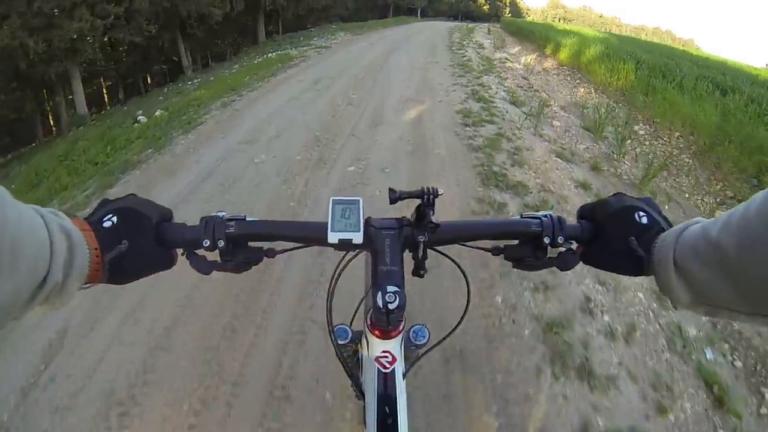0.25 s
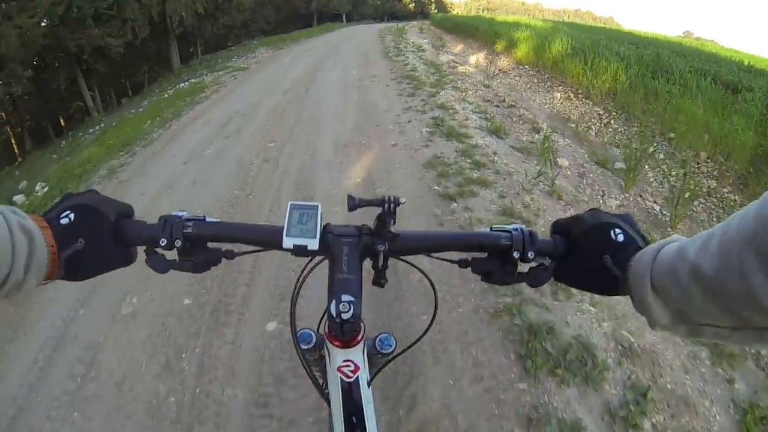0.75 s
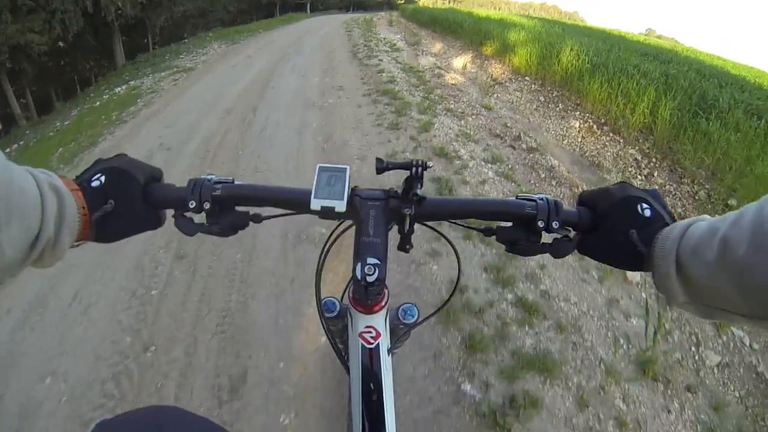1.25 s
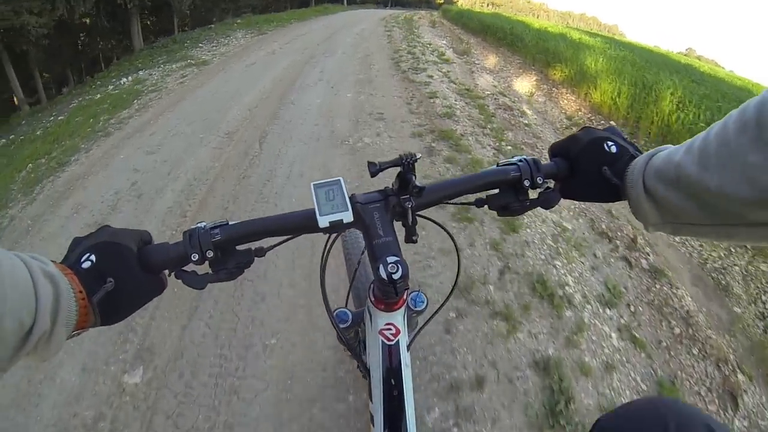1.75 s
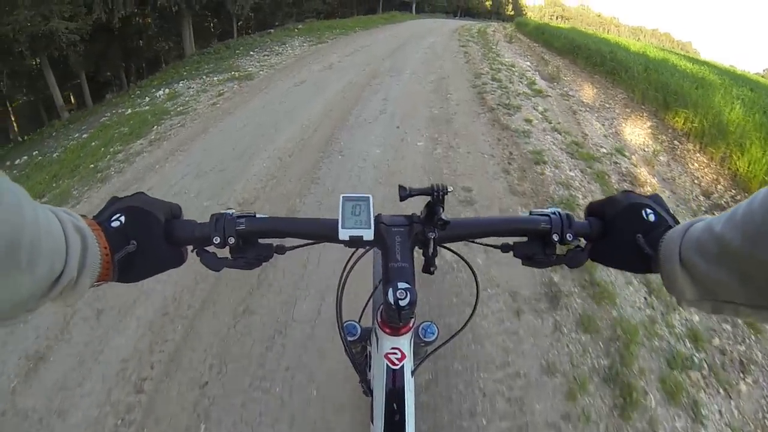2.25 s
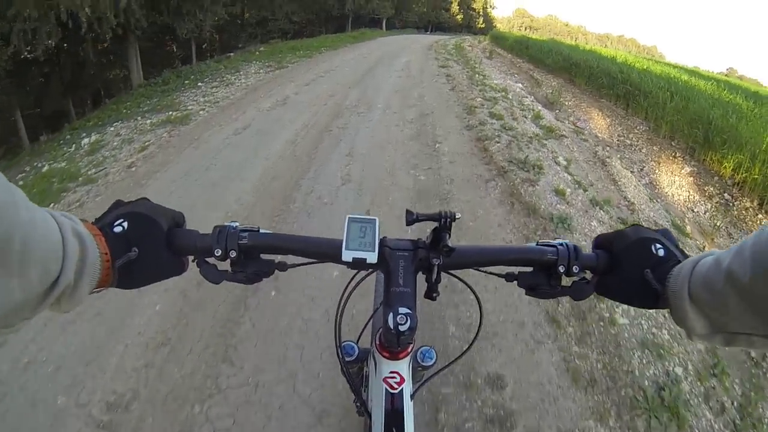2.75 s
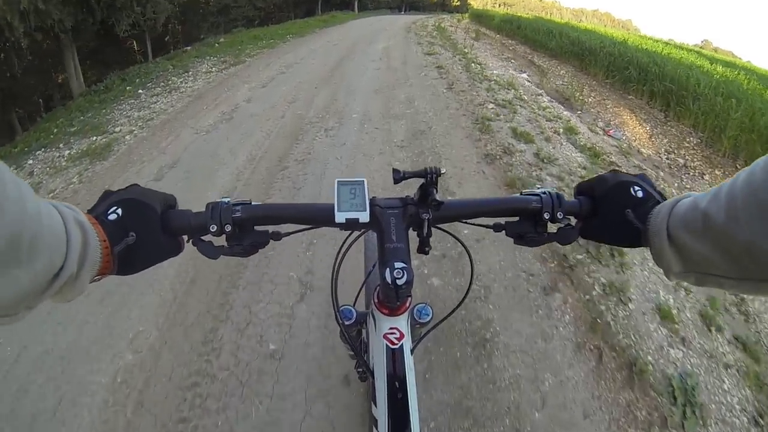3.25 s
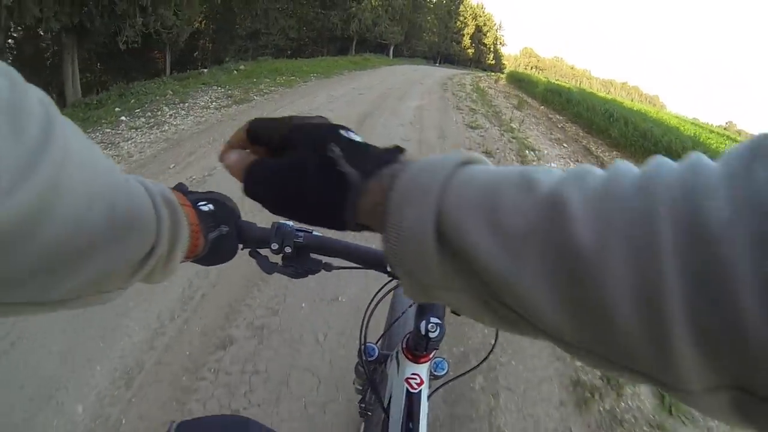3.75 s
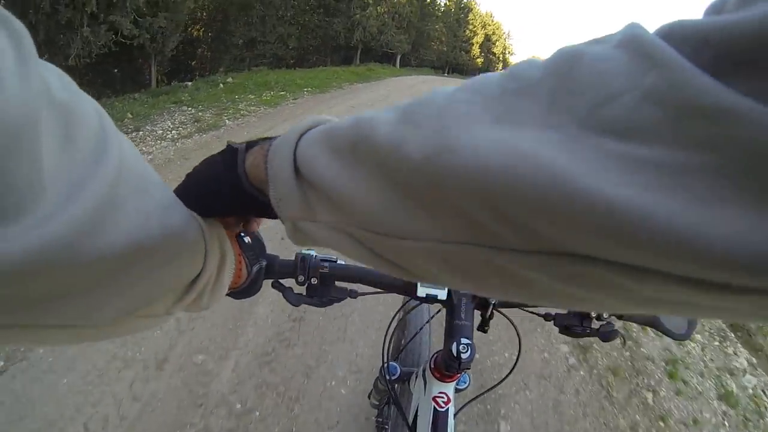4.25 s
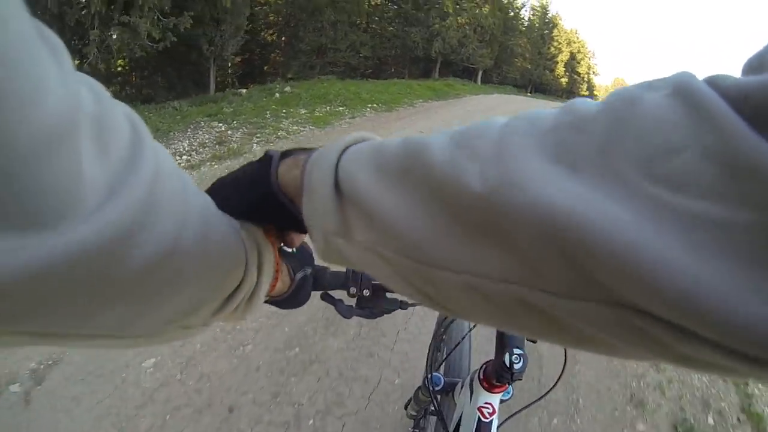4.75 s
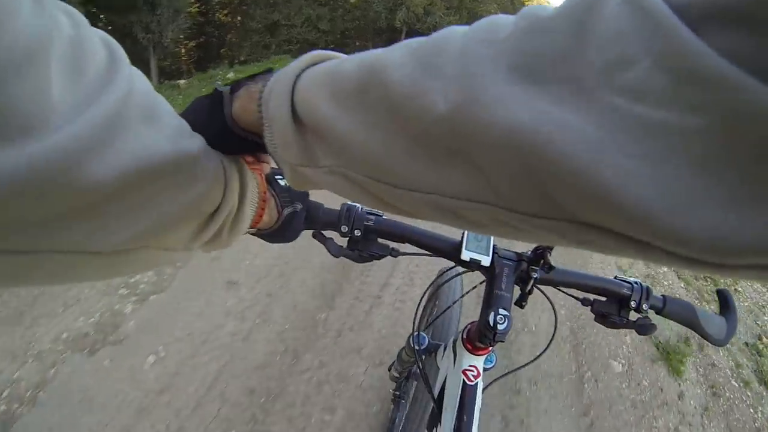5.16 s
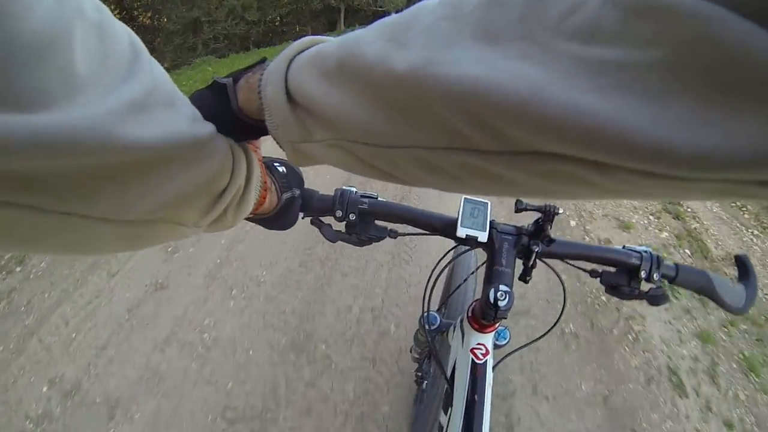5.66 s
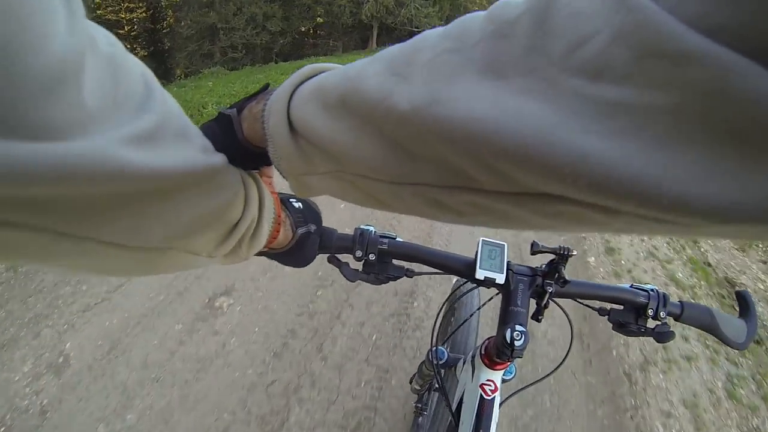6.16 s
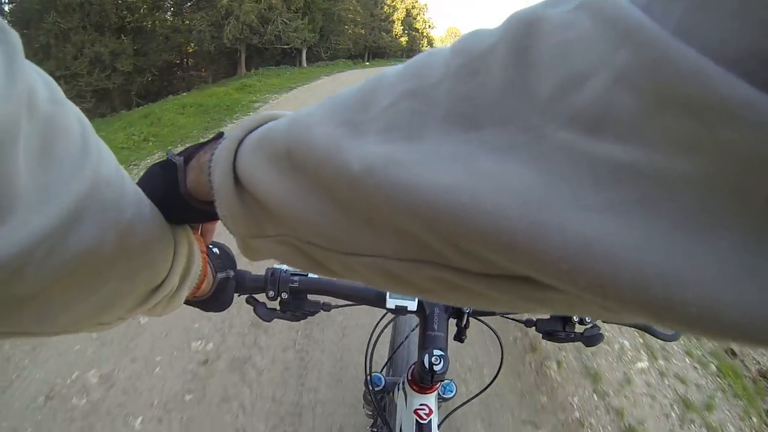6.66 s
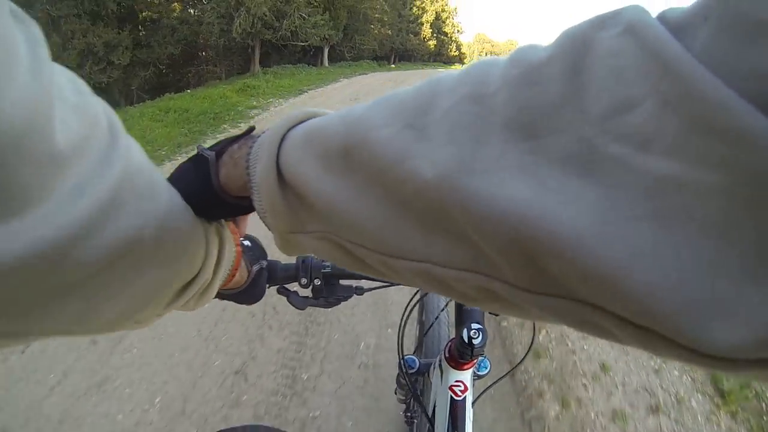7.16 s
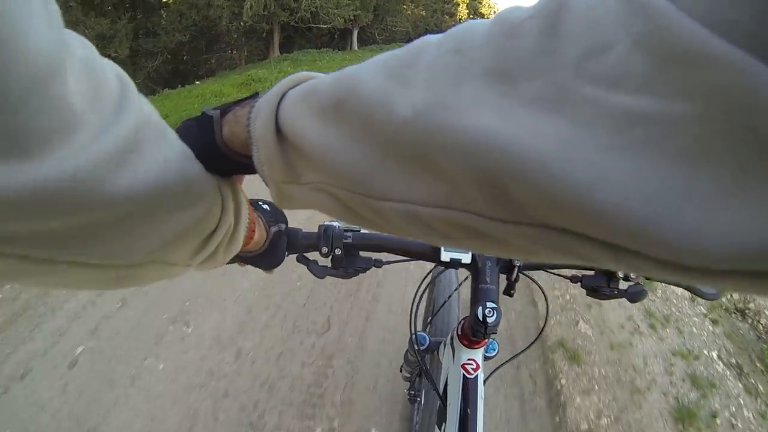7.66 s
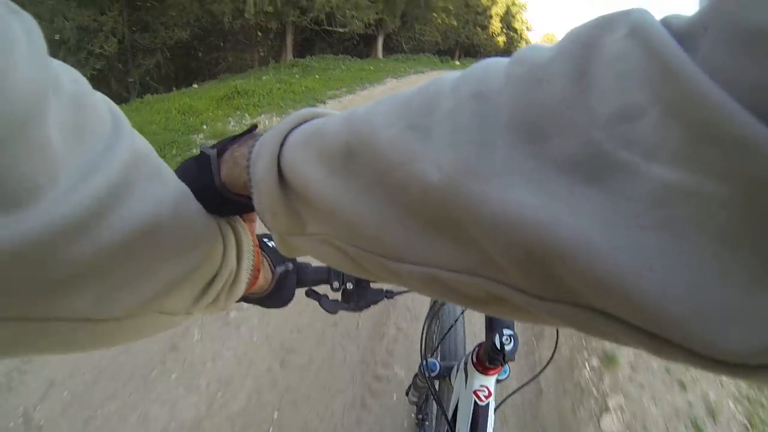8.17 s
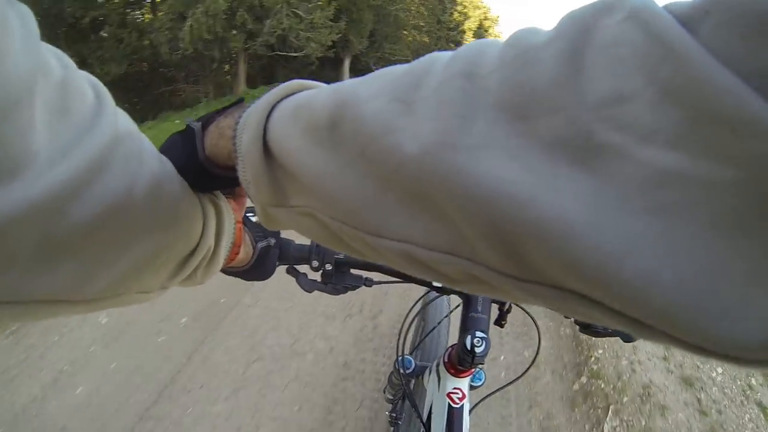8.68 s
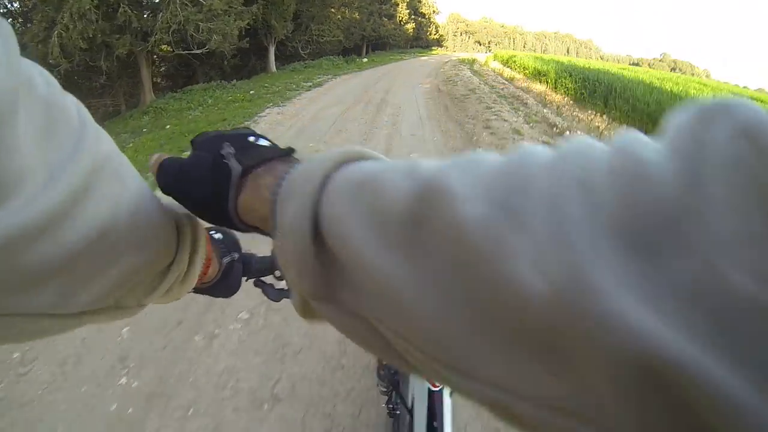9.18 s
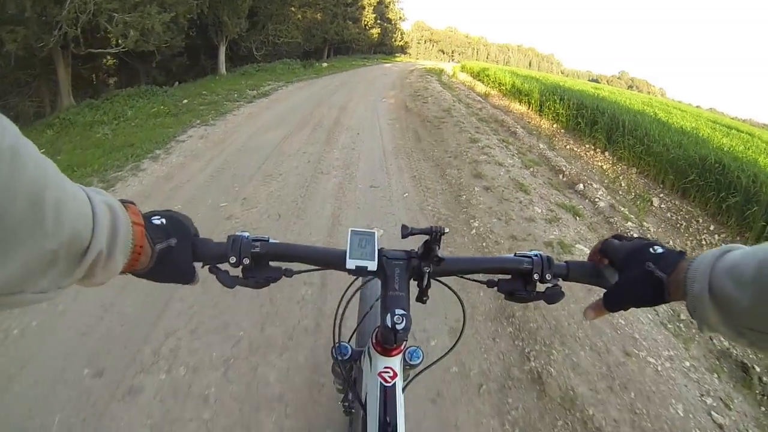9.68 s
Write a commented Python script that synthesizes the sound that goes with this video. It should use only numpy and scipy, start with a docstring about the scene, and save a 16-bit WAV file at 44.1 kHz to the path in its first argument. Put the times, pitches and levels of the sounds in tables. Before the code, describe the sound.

Steady tyre rumble and gritty crunching come from a bicycle on an outdoor gravel track, with wind thumping on a body-worn microphone and stones popping under the tread. Partway through, the rider's arm bumps and scrapes the camera. Stronger gusts and a few loud stone snaps follow, while the plastic camera mount clacks and briefly buzzes. Near the end a sleeve swishes past and the tyres roll on.

```python
"""Tyres rumble and crunch over gravel as a mountain bike rolls on, heard from a chest-worn camera.
Tread impacts merge into noise that swells with each pedal stroke, stones snap out from under the
tyres, and turbulent air buffets the housing. The rider reaches across to one wrist: a sleeve rustles
by friction and the arm lands on the camera. As the bike jolts, impacts excite resonant modes:
the housing knocks dully and the plastic mount taps and clacks."""
import sys
import numpy as np
from scipy import signal
from scipy.fft import rfft, irfft
from scipy.io import wavfile

SR = 44100
rng = np.random.default_rng(int(sys.argv[2]) if len(sys.argv) > 2 else 0)


def unload_audio(sound):
    """Save the sound as a 16-bit wav file, at the path given as the first command line argument."""
    columns = np.transpose(np.atleast_2d(sound))
    # keep every value between -1 and 1, then stretch to whole-number steps
    steps = np.round(np.clip(columns, -1, 1) * 32767)
    wavfile.write(sys.argv[1], SR, steps.astype(np.int16))


N = 437472
TIME = np.arange(N) / SR


def from_db(db):
    """Amplitude ratio of a level in decibels."""
    return 10 ** (np.asarray(db) / 20)


def unit_rms(x):
    """Normalisation to unit power."""
    return x / np.sqrt(np.mean(x ** 2) + 1e-20)


def curves(rows):
    """Linear interpolation: each column after the time, at every sample."""
    times, *columns = np.transpose(rows)
    return [np.interp(TIME, times, column) for column in columns]


def add(out, start_s, sound):
    """Superposition of a sound on the output."""
    start = round(start_s * SR)
    out[start:start + len(sound)] += sound[:N - start]


def swells(rows):
    """Amplitude envelope: one half-sine arch per row."""
    return sum(from_db(db) * np.sin(np.pi * np.clip((TIME - s) / length, 0, 1)) for s, length, db in rows)


def drift(corner_hz):
    """Low-passed Gaussian noise: a smooth fluctuation of unit power."""
    hz = np.fft.rfftfreq(N, 1 / SR)
    return unit_rms(irfft(rfft(rng.standard_normal(N)) / (1 + (hz / corner_hz) ** 2), N))


def grains(per_s, spread_db):
    """Shot noise: random clicks, a few much larger than the rest (smaller if the spread is negative)."""
    sizes = from_db(spread_db * np.minimum(rng.exponential(1, N), 4)) * rng.choice([-1, 1], N)
    return sizes * (rng.random(N) < per_s / SR)


def band(x, low_hz, high_hz):
    """Butterworth band-pass filter."""
    return signal.sosfilt(signal.butter(3, [low_hz, high_hz], "band", fs=SR, output="sos"), x)


def colour(x, spectrum):
    """Minimum-phase filter that follows a spectrum and falls 12 dB per octave beyond its ends."""
    size = 8192
    hz, level_db = np.transpose(spectrum)
    log_hz = np.log(np.fft.rfftfreq(size, 1 / SR) + 1)
    beyond = np.maximum(log_hz - np.log(hz[-1]), 0) + np.maximum(np.log(hz[0]) - log_hz, 0)
    gain = from_db(np.interp(log_hz, np.log(hz), level_db))
    cepstrum = irfft(np.log(gain) - 2 * beyond)
    cepstrum[1:size // 2] *= 2  # folding the cepstrum makes the response causal
    cepstrum[size // 2 + 1:] = 0
    return signal.fftconvolve(x, irfft(np.exp(rfft(cepstrum))))[:len(x)]


def pole_pair(hz, width_hz):
    """Damped oscillator: its pole radius and feedback coefficients."""
    radius, angle = np.exp(-np.pi * width_hz / SR), 2 * np.pi * hz / SR
    return radius, [1, -2 * radius * np.cos(angle), radius * radius]


def resonate(x, modes, in_phase=False):
    """Modal superposition: neighbours alternate in sign, or share it and leave notches between them."""
    out = 0
    for k, (hz, width_hz, level_db) in enumerate(modes):
        radius, poles = pole_pair(hz, width_hz)
        sign = 1 if in_phase else (-1) ** k
        out = out + sign * from_db(level_db) * signal.lfilter([1 - radius, 0, radius - 1], poles, x)
    return out


def contact(chatter, chatter_s):
    """Contact force: one impulse, then tiny rebounds that die out as the part seats."""
    t = TIME[:SR // 8]
    force = chatter * rng.standard_normal(len(t)) * np.exp(-(t / chatter_s) ** 2)
    force[0] += 1
    return force


def pushes(rows, rise_cycles):
    """Heavily damped oscillation: each soft shove swings for a cycle or two."""
    out, t = np.zeros(N), TIME[:SR // 4]
    for s, peak_db, hz in rows:
        age = hz * t / rise_cycles
        envelope = from_db(peak_db) * (age * np.exp(1 - age)) ** 2
        add(out, s, -envelope * np.sin(2 * np.pi * hz * t))
    return out


# the forearm in front of the camera: (time [s], share covered [0-1])
ARM_COVER = [(0, 0.03), (3.9, 0.03), (4.6, 0.64), (9.15, 1), (9.45, 0)]

def arm_cover():
    """Obstruction: the share of the way to the camera that the forearm blocks."""
    return curves(ARM_COVER)[0]


# tones of the electronics: (frequency [Hz], bandwidth [Hz], gain [dB])
WHINE_TONES = [(10070, 240, -16), (10500, 25, -22)]

def whine():
    """Narrow-band noise: the electronics' thin whine, weaker in the forearm's acoustic shadow."""
    level_db = -82.5 - 4 * arm_cover()
    return from_db(level_db) * unit_rms(resonate(rng.standard_normal(N), WHINE_TONES))


# strength of the airstream: (time [s], level [dB])
AIRSTREAM = [(0, -41.5), (.45, -38.5), (1.15, -40.5), (1.8, -43.5), (3.2, -44), (3.8, -42.5), (4.6, -40),
             (5.2, -36.5), (5.9, -37), (6.95, -38), (7.7, -35.5), (8.25, -35.5), (9.0, -34.5),
             (9.35, -39.5), (9.92, -41)]
# spectra of the free stream and of the forearm's wake: (frequency [Hz], relative level [dB])
STREAM_SPECTRUM = [(15, -8.5), (28, -4), (45, 3), (68, -2.5), (90, -6), (120, -15), (160, -9.5), (220, -24),
                   (500, -33.5)]
WAKE_SPECTRUM = [(15, -20), (28, 0.5), (45, 0.5), (70, -2), (110, -2), (160, -9), (220, -14.5), (400, -38),
                 (900, -47)]
# the strongest gusts: (time [s], duration [s], level [dB])
BUFFETS = [(4.985, 0.068, -39), (5.17, 0.081, -37), (5.33, 0.11, -38), (5.61, 0.098, -39), (5.85, .1, -42),
           (6.38, 0.061, -39), (7.23, 0.14, -37), (7.84, 0.08, -37), (8.62, .09, -36), (9.16, 0.049, -35)]
# single eddies striking the housing: (time [s], envelope peak [dB], frequency [Hz])
EDDY_THUMPS = [(1.281, -27, 68), (5.008, -27, 80), (5.637, -23, 95), (6.392, -23, 58), (6.402, -29, 130),
               (7.243, -25, 62), (7.875, -30, 71)]

def wind():
    """Turbulence: low pressure fluctuations on the housing; the forearm sheds smaller, higher eddies."""
    stream_db, = curves(AIRSTREAM)
    cover = arm_cover()
    free = unit_rms(colour(rng.standard_normal(N), STREAM_SPECTRUM))
    wake = unit_rms(colour(rng.standard_normal(N), WAKE_SPECTRUM))
    gust_db = 1.5 * drift(corner_hz=13)
    strength = from_db(stream_db + gust_db) + swells(BUFFETS)
    turbulence = np.sqrt(1 - cover) * free + np.sqrt(cover) * wake
    return strength * turbulence + pushes(EDDY_THUMPS, rise_cycles=0.65)


# the sleeve sliding, its folds crinkling, the forearm sweeping by: (time [s], duration [s], level [dB])
RUSTLES = [(.95, .35, -82), (3.35, .73, -78), (4.14, .25, -74), (4.47, 0.12, -82), (4.75, .32, -76),
           (5.39, .23, -80), (7.0, .35, -82), (9.19, .22, -69), (9.5, 0.46, -86)]
CRINKLES = [(.95, 0.0056, -61), (1.245, .005, -61), (4.24, .004, -63), (4.317, 0.0055, -64),
            (4.5363, .003, -55), (5.4807, .004, -62), (9.131, .006, -66), (9.346, .003, -53)]
SWEEPS = [(9.18, 0.097, -39.5), (9.24, 0.15, -44)]
# spectra of the fibres' hiss and of the fuller sweep: (frequency [Hz], relative level [dB])
HISS_SPECTRUM = [(3000, -5.5), (5000, 8), (7000, -0.5), (8700, 2.5), (9600, -2), (10600, -0.5),
                 (11500, -5.5), (13300, -5), (15000, -16)]
SWEEP_SPECTRUM = [(400, -1), (800, 11), (1300, -1), (2000, 3), (3200, -3), (4200, -14), (5500, -19),
                  (7000, -27)]

def sleeve():
    """Sliding friction: countless fibres slip in a hiss that flutters as the weave catches and lets go."""
    catching = from_db(2.5 * np.clip(drift(corner_hz=90), -2, 2))
    fidgeting = from_db(-73 + 0.3 * drift(corner_hz=5))
    strength = fidgeting + swells(RUSTLES) * catching + swells(CRINKLES)
    fibres = grains(per_s=16000, spread_db=5)
    hiss = strength * unit_rms(colour(fibres, HISS_SPECTRUM))
    sweep = swells(SWEEPS) * np.sqrt(catching) * unit_rms(colour(fibres, SWEEP_SPECTRUM))
    return hiss + sweep


# the ground along the track: (time [s], base rumble level [dB], base crunch level [dB])
GROUND = [(0.0, -42.5, -52), (1.16, -43, -51), (1.85, -45, -53), (2.29, -44, -51.5), (2.73, -44, -53),
          (3.29, -40, -50), (4.34, -43.5, -51.5), (5.17, -41.5, -52), (6.66, -41.5, -54.5),
          (7.04, -40, -51), (7.9, -41.5, -53), (8.15, -39.5, -50), (8.37, -41.5, -54.5),
          (9.28, -41.5, -51.5), (9.56, -41.5, -52), (9.92, -41.5, -49.5)]

def tread_levels(stroke_s=0.42, dead_centre_s=0.24):
    """Amplitude modulation: rumble and crunch ease at the crank's dead centres and vary with the ground."""
    rumble_db, crunch_db = curves(GROUND)
    slack = 1 - np.abs(np.sin(np.pi * (TIME - dead_centre_s) / stroke_s))
    uneven = drift(corner_hz=8.9)
    return rumble_db - 1.5 * slack + 0.9 * uneven, crunch_db - slack + 0.95 * uneven


# spectrum of flying sand: (frequency [Hz], relative level [dB])
SAND_SPECTRUM = [(1000, -8), (2200, 12.5), (3300, 6), (4200, 0.5), (5450, -20), (5900, -16), (7000, -17),
                 (9000, -29), (14000, -26)]

def sand(crunch_db):
    """Clustered shot noise: sand spits off the tread, slightly louder while the forearm is in front."""
    bunching = from_db(8 * np.clip(drift(corner_hz=45), -2, 2))
    spray = unit_rms(colour(grains(per_s=110 * bunching, spread_db=2.5), SAND_SPECTRUM))
    return from_db(crunch_db - 9.5 + 1.5 * arm_cover()) * spray


# spectra of knobs on packed dirt and of crushed gravel: (frequency [Hz], relative level [dB])
RUMBLE_SPECTRUM = [(120, -19), (185, -9), (235, 3), (300, 3.5), (390, -0.5), (500, 0), (630, -5), (800, -3),
                   (1000, -8.5), (1300, -24), (1900, -64), (3500, -36.5)]
CRUNCH_SPECTRUM = [(300, -7.5), (600, 0.5), (900, 6.5), (1200, 6.5), (1500, 0.5), (1950, 7), (2400, 0.5),
                   (3200, -1.5), (4000, -13.5), (5450, -22), (5950, -58), (9000, -47), (15000, -64)]
# jolts over loose gravel: (time [s], duration [s], crunch level [dB], rumble level [dB])
LOOSE_PATCHES = [(0.106, 0.03, -58, -64), (0.214, 0.046, -57, -55), (0.388, 0.045, -49, -44),
                 (0.463, 0.035, -43, -41), (0.545, 0.039, -46, -47), (0.734, 0.031, -44.5, -40),
                 (0.874, 0.051, -46, -39.5), (0.938, 0.017, -55, -49), (0.998, 0.042, -40.5, -38.5),
                 (1.06, 0.043, -43, -47), (1.162, 0.035, -42.5, -52), (1.47, 0.038, -53, -42),
                 (1.564, .014, -42, -46), (1.631, 0.053, -54, -49), (2.272, 0.06, -47, -46),
                 (2.37, 0.066, -49, -46.5), (2.556, 0.027, -63, -66), (3.114, .06, -55, -50),
                 (3.284, 0.01, -32, -34), (6.777, 0.038, -46, -42), (7.076, 0.011, -48, -43),
                 (8.326, .019, -44, -38), (9.708, 0.011, -36.5, -40)]
# the tyre striking embedded stones: (time [s], envelope peak [dB], frequency [Hz])
TYRE_KNOCKS = [(.9155, -25, 480), (3.284, -20.5, 400), (7.0785, -28, 560), (8.334, -27, 480),
               (9.706, -25, 560)]

def tyres(rumble_db, crunch_db):
    """Rolling noise: knobs drum on packed dirt and crush gravel; rough ground raises both together."""
    roughness = drift(corner_hz=32)
    drumming = colour(grains(per_s=5000, spread_db=3.5), RUMBLE_SPECTRUM)
    rumble = unit_rms(drumming * from_db(1.1 * roughness))
    crushing = grains(per_s=7000 * from_db(2.5 * roughness), spread_db=3)
    crunch = unit_rms(colour(crushing, CRUNCH_SPECTRUM))
    rolling = from_db(rumble_db + 1) * rumble + from_db(crunch_db + 3.5) * crunch
    loose = unit_rms(colour(grains(per_s=1100, spread_db=-4.5), CRUNCH_SPECTRUM))
    jolts = loose * swells([(s, length, db) for s, length, db, _ in LOOSE_PATCHES])
    jolts += rumble * swells([(s, length, db) for s, length, _, db in LOOSE_PATCHES])
    return rolling + jolts + pushes(TYRE_KNOCKS, rise_cycles=0.39)


def pebbles(per_s=7, peak_db=-35, ring_hz=2230, treble_db=9):
    """Poisson process: small stones met at random, as rows like those of LARGE_STONES."""
    times = TIME[rng.random(N) < per_s / SR]
    scatter = np.clip(rng.standard_normal((len(times), 3)), -2, 2)
    return [(s, peak_db - weak, ring_hz * 2 ** (0.15 * small), treble_db + 2 * hard)
            for s, (weak, small, hard) in zip(times, scatter)]


# the largest stones snapping: (time [s], peak level [dB], ring frequency [Hz], treble gain [dB])
LARGE_STONES = [(0.467, -32, 2350, 12), (.54, -32, 2200, -6), (.565, -32.5, 2400, 13),
                (.658, -28, 2230, 10), (.8778, -32, 2370, 13), (.895, -29, 2000, -6),
                (.916, -29, 2400, -10), (.92, -34, 2500, -10), (1.017, -35, 2000, -2),
                (1.03, -33, 2280, 17), (1.0755, -35, 2300, 6), (1.247, -38, 2400, 16),
                (1.34, -28.5, 2470, 12), (1.7547, -32, 2230, 4), (2.007, -37, 2300, -2),
                (2.0208, -30, 2330, -1), (2.147, -30, 2400, 5), (3.258, -29, 1970, -8),
                (3.78, -31, 2200, -4), (3.827, -30.5, 2100, -6), (3.847, -27, 2000, -6),
                (4.416, -34.5, 2300, -2), (4.495, -32, 2400, 3), (5.3805, -16.5, 2550, -2),
                (5.4023, -25.5, 2900, -1), (5.926, -28, 2030, -10), (6.766, -28.5, 2470, 1),
                (6.785, -31, 2350, 1), (6.847, -32, 2400, 5), (6.876, -26.5, 2370, 2),
                (6.971, -29, 2400, 7), (7.0347, -30, 2400, -3), (7.0788, -33, 2400, 7),
                (7.108, -28, 2630, 2), (7.315, -32, 2400, 7), (7.5224, -14.5, 2550, -3),
                (7.7469, -22.5, 2400, 22.5), (7.7487, -18.5, 2150, -3), (9.766, -27, 2220, 14),
                (9.819, -26, 2350, 10)]
# what the housing transmits of a snap: (frequency [Hz], gain [dB])
SNAP_SPECTRUM = [(400, -2.5), (900, 2), (1500, -1.5), (2100, 0), (2800, -3), (3600, -5.5), (4300, -12),
                 (5200, -16.5), (5900, -32), (7200, -31), (9000, -33), (15000, -50)]

def stones(ring_width_hz=820, ring_db=8.5):
    """Impulse excitation: a stone snaps from under the tread, higher when small, brighter when hard."""
    out = np.zeros(N)
    for s, peak_db, ring_hz, treble_db in LARGE_STONES + pebbles():
        snap = colour(contact(chatter=0.09, chatter_s=0.0032), SNAP_SPECTRUM)
        snap = snap + resonate(snap, [(ring_hz, ring_width_hz, ring_db)])
        shelf = [(100, 0), (2800, 0), (4800, treble_db / 2), (8000, treble_db), (16000, treble_db - 7)]
        snap = colour(snap, shelf)
        add(out, s, from_db(peak_db) * snap / np.max(np.abs(snap)))
    return out


def rubs(rows, modes, slips_per_s, top_hz):
    """Stick-slip excitation: short swells of tiny slips keep the modes ringing."""
    ringing = resonate(grains(slips_per_s, spread_db=1.5), modes)
    return swells(rows) * unit_rms(band(ringing, 410, top_hz))


# registers of a blow (body, ring, crack, edge, sizzle): (lower edge [Hz], upper edge [Hz])
REGISTERS = [(400, 1500), (1500, 2400), (2400, 3650), (3650, 7000), (7000, 15000)]

def blows(rows, modes, balance_db, chatter, bass_db, top_loss_db, in_phase=False):
    """Modal impact: the contact point shifts the main mode, hardness tilts the spectrum, mass adds body."""
    out, attack = np.zeros(N), round(0.007 * SR)
    pivot_hz, max_octaves = 1760, 2.35
    centres_hz = np.sqrt(np.prod(REGISTERS, axis=1))
    octaves = np.minimum(np.log2(centres_hz / pivot_hz), max_octaves)
    main = np.argmax([db for _, _, db in modes])
    for s, level_db, tilt, body_db, chatter_s, ring_hz in rows:
        struck = [(ring_hz if k == main else hz, width, db) for k, (hz, width, db) in enumerate(modes)]
        hit = resonate(contact(chatter, chatter_s), struck, in_phase)
        targets_db = level_db + np.array(balance_db) + tilt * octaves
        targets_db[0] += body_db
        gains = []  # bring the attack in each register to its target level
        for (low, high), target_db in zip(REGISTERS, targets_db):
            attack_db = 10 * np.log10(np.mean(band(hit, low, high)[:attack] ** 2))
            gains += [(hz, target_db - attack_db) for hz in (low * 1.1, high / 1.1)]
        bass = (100, gains[0][1] + bass_db)
        top = (15000, gains[-1][1] - top_loss_db)
        add(out, s, colour(hit, [bass] + gains[:-1] + [top]))
    return out


# modes of the housing: (frequency [Hz], bandwidth [Hz], gain [dB])
HOUSING_MODES = [(220, 500, -14.5), (392, 79, -3.5), (547, 175, 2), (762, 53, 15), (957, 38, 11),
                 (1140, 100, 5), (1414, 150, -2.5), (1810, 270, -5.5), (2120, 1040, -10.5),
                 (2500, 360, -7.5), (2780, 160, -12), (3260, 58, -14), (5460, 520, -48), (7060, 400, -42),
                 (10500, 790, -58)]
# dull knocks of the housing, from a jolt or the arm:
# (time [s], base level [dB], tilt [dB/octave], extra body [dB], chatter [s], main mode [Hz])
HOUSING_KNOCKS = [(3.2842, -35, -7.5, -4.5, 0.0038, 800), (3.9185, -18, 0.9, 3, 0.0039, 770),
                  (3.924, -25, -6, 0.5, 0.0039, 750), (3.9625, -30.5, -1, 6.5, 0.0038, 773),
                  (3.9675, -36.5, -12, -1.5, .0006, 770), (4.2885, -36.5, 4.5, -3, .004, 770),
                  (4.5606, -36, -5, 2.5, 0.0026, 760)]
# an ordinary knock, register by register: (relative level [dB])
KNOCK_BALANCE = [1, 0, -5, -25.5, -34.5]
# the forearm's weight landing: (time [s], envelope peak [dB], frequency [Hz])
ARM_THUDS = [(3.9195, -25, 210)]
# short scrapes and rattles of the housing: (time [s], duration [s], level [dB])
HOUSING_SCRAPES = [(3.29, 0.029, -38), (3.42, 0.11, -41.5), (3.97, 0.078, -37), (4.06, 0.073, -38.5),
                   (4.144, 0.051, -33), (4.18, 0.059, -40.5), (4.69, 0.065, -37.5), (6.912, 0.052, -39)]

def housing():
    """Structure-borne sound: dull knocks, scrapes and rattles excite the housing's modes; the arm thuds."""
    knocks = blows(HOUSING_KNOCKS, HOUSING_MODES, KNOCK_BALANCE, chatter=0.18, bass_db=12.5,
                   top_loss_db=3)
    scrapes = rubs(HOUSING_SCRAPES, HOUSING_MODES, slips_per_s=3800, top_hz=3000)
    return knocks + scrapes + pushes(ARM_THUDS, rise_cycles=0.39)


# modes of the unseated mount: (frequency [Hz], bandwidth [Hz], gain [dB])
LOOSE_MODES = [(2040, 50, 6), (3310, 130, -21)]
# buzzes after a jolt: (time [s], duration [s], level [dB])
BUZZES = [(6.612, 0.033, -42), (6.915, 0.054, -41), (8.738, 0.045, -36.5), (8.795, 0.042, -51),
          (9.038, .018, -43), (9.085, .026, -37.5)]

def mount_buzz():
    """Reduced damping: while unseated, the mount rings more freely as it slips."""
    return rubs(BUZZES, LOOSE_MODES, slips_per_s=6400, top_hz=3600)


# modes of the plastic mount: (frequency [Hz], bandwidth [Hz], gain [dB])
MOUNT_MODES = [(770, 61, 0), (1032, 100, -3.5), (1190, 115, 0), (1445, 150, -4), (1860, 170, 13.5),
               (2548, 94, 4.5), (2980, 88, -4), (3294, 140, 3), (4300, 650, -7), (5370, 240, 5),
               (6020, 200, -19), (6940, 420, -7.5), (8700, 260, 5.5), (10700, 500, -13)]
# clacks and light taps of the mount:
# (time [s], base level [dB], tilt [dB/octave], extra body [dB], chatter [s], main mode [Hz])
CLACKS = [(1.474, -36.5, -6, -5, 0.004, 2000), (1.4855, -42, -2.5, -3, 0.0046, 1940),
          (1.579, -46, 2, -4, 0.0055, 2090), (1.7185, -42, -2, -1, 0.0039, 1890),
          (3.183, -36.5, -8, -6, .003, 1960), (3.2845, -31.5, -3.5, 0, .003, 1970),
          (4.5603, -30, 4, 12, 0.0072, 2050), (4.727, -41.5, -5, -12, 0.008, 1930),
          (5.0962, -42, -2, 3, 0.0036, 2010), (6.4657, -17.5, 1.4, 3.5, .0045, 1990),
          (6.4735, -30, -7, 0, 0.0052, 2020), (6.5462, -23.5, 1.5, 4.5, 0.0056, 2050),
          (6.573, -41.5, -4, 5, .007, 2090), (6.911, -18, 3, 2, 0.0081, 2020),
          (6.922, -28, -6, -3, .009, 2050), (6.931, -30.5, 1.5, 6.5, .0084, 1980),
          (7.3405, -35.5, 0, 3, .002, 2020), (7.5028, -24, -2, -4.5, 0.007, 1990),
          (8.1948, -11.5, 6, 1, 0.0032, 2040), (8.205, -28, 3, 2, 0.0068, 2080),
          (8.5378, -27.5, 3, 0.5, 0.0054, 1980), (8.6841, -18, 3.5, 4, 0.0053, 2010),
          (8.6925, -31.5, -1, 2, 0.0059, 2020), (9.0178, -15.5, 3, -1, 0.0069, 1970),
          (9.1727, -26.5, 2, -1, 0.0074, 2020), (9.232, -35.5, 0.5, 0, .0065, 2000)]
# an ordinary clack, register by register: (relative level [dB])
CLACK_BALANCE = [-4, 2, -7.5, -24, -37.5]

def mount_clacks():
    """Free vibration of the struck mount; group delay near the main mode makes each clack build up."""
    hits = blows(CLACKS, MOUNT_MODES, CLACK_BALANCE, chatter=0.08, bass_db=-7, top_loss_db=13,
                 in_phase=True)
    _, poles = pole_pair(hz=2150, width_hz=1300)
    return signal.lfilter(poles[::-1], poles, hits + 1e-18)  # all-pass


def scene():
    """Free-field superposition: camera, air, cloth and track add up without reverberation."""
    rumble_db, crunch_db = tread_levels()
    camera = mount_clacks() + housing() + mount_buzz() + whine()
    mix = camera + wind() + sleeve() + tyres(rumble_db, crunch_db) + sand(crunch_db) + stones()
    return mix[None]


def record(dry):
    """Overload and band limiting: peaks are hard-limited, then the highest treble is cut."""
    ceiling, cutoff_hz = 0.96, 15100
    low_pass = signal.ellip(10, 0.1, 80, cutoff_hz, fs=SR, output="sos")
    return signal.sosfilt(low_pass, np.clip(dry, -ceiling, ceiling))


dry = scene()
out = record(dry)
unload_audio(out)
```